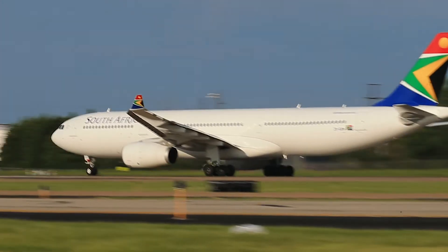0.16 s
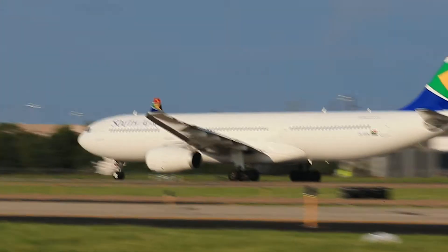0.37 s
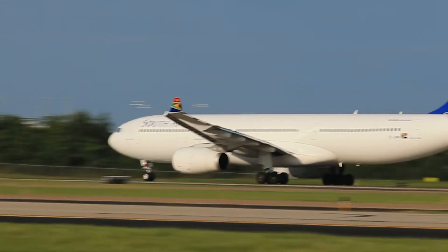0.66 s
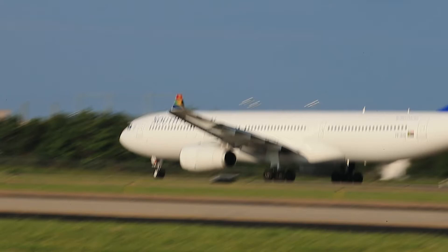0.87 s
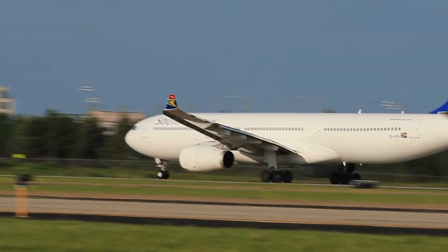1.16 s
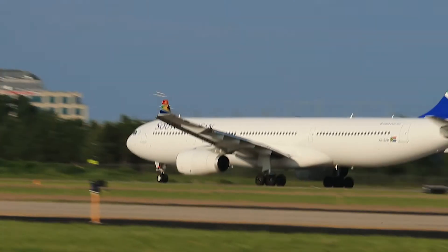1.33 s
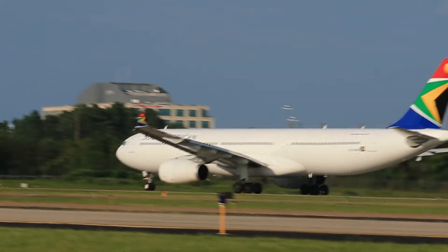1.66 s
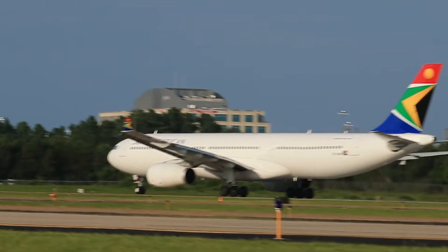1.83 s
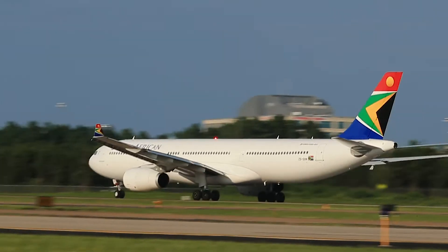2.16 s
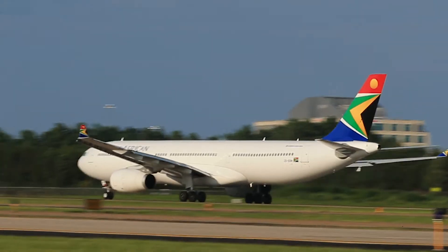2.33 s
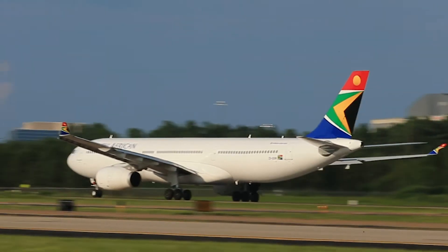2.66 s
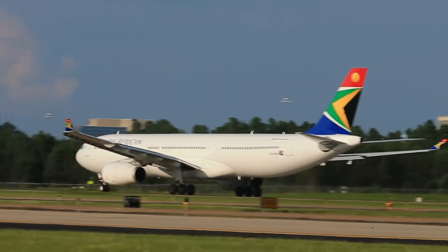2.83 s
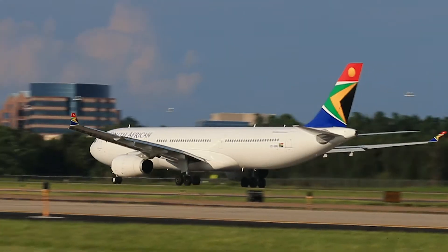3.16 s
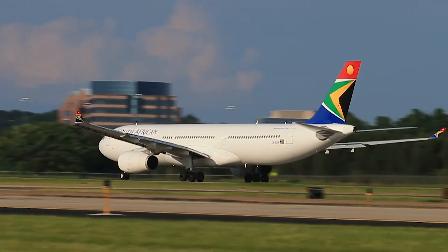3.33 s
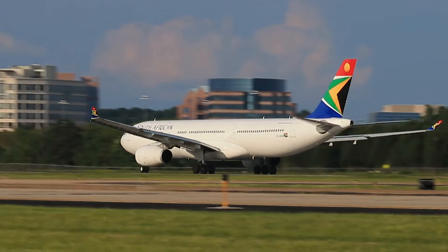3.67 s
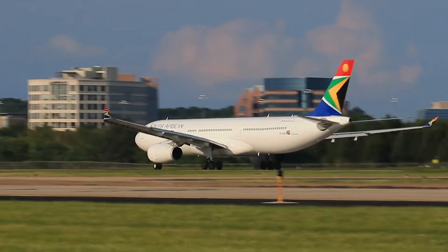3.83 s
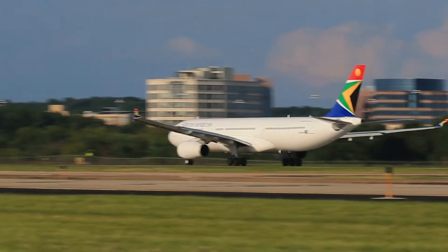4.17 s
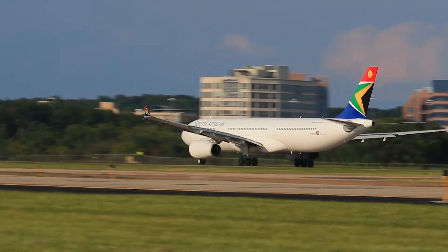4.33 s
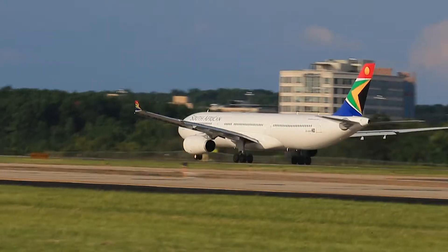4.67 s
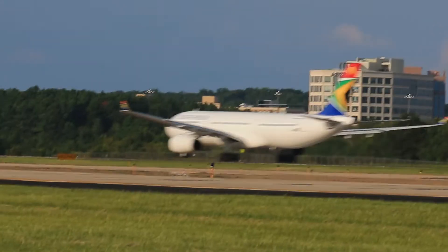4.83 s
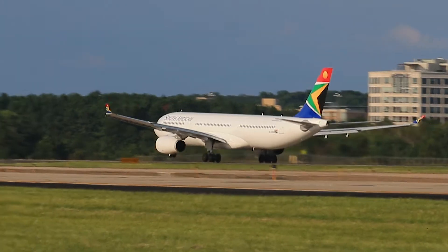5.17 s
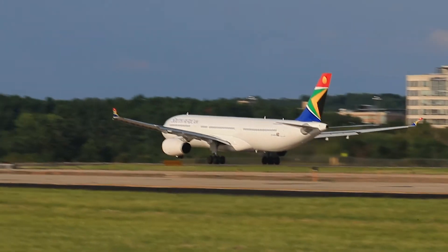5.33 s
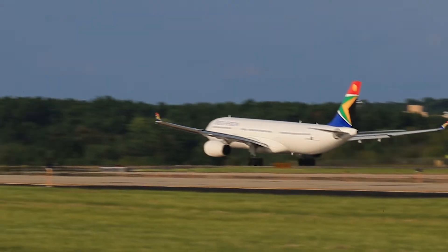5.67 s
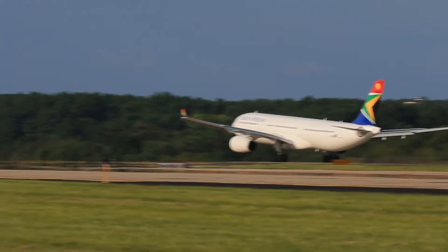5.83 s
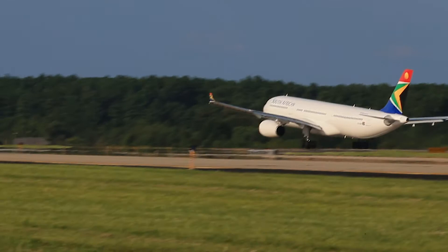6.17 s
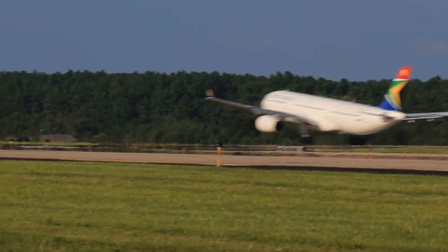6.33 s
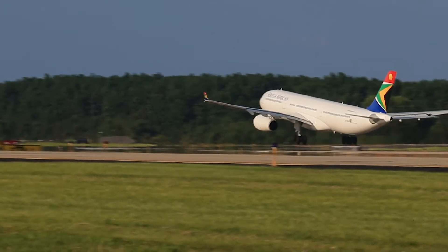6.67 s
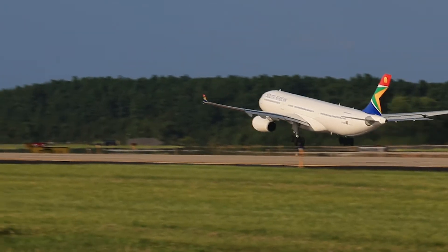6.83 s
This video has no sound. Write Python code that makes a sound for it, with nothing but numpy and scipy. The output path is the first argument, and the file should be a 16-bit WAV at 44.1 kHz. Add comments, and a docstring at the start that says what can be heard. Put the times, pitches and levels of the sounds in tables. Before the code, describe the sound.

The deep, surging rumble and roar of a departing twin-engine jet, heard beside the runway, with a few soft camera shutter snaps.

```python
"""Airliner takeoff from beside the airfield

A twin jet runs past and draws away. Its exhaust rumble sinks in pitch as the jets turn towards the
listener; a finer roar fades and swells in gusty air, with brief whistles. The two fans' beating whine
dies early. Nearby, insects sing faintly, a stills camera fires seven times and something clicks once."""
import sys
import numpy as np
from scipy import signal
from scipy.fft import rfft, irfft, next_fast_len
from scipy.io import wavfile
from scipy.ndimage import uniform_filter1d, map_coordinates

SR = 44100
rng = np.random.default_rng(int(sys.argv[2]) if len(sys.argv) > 2 else 0)


def bounce(signal):
    """Save signal as a 16-bit WAV file at the path given by the first command-line argument."""
    frames = np.transpose(np.atleast_2d(signal))
    limited = np.clip(frames, -1, 1)
    pcm = np.round(limited * 32767).astype(np.int16)
    wavfile.write(sys.argv[1], SR, pcm)


N = 308700
TIME = np.arange(N) / SR


def amp(db):
    """Decibels to gain."""
    return 10 ** (np.asarray(db) / 20)


def unit(x):
    """Scale to rms 1."""
    return x / np.sqrt(np.mean(x ** 2) + 1e-20)


def along(points, hz):
    """Interpolate (freq_hz, value) rows on a log axis."""
    freq_hz, values = np.transpose(points)
    return np.interp(np.log(hz + 1e-3), np.log(freq_hz), values)


def curves(rows, t=TIME):
    """Interpolate each column after time_s at times t."""
    time_s, *columns = np.transpose(rows)
    return [np.interp(t, time_s, column) for column in columns]


def wobble(rate_hz):
    """Smooth random curve, rate_hz knots a second."""
    return map_coordinates(rng.standard_normal(int(N * rate_hz / SR) + 4), [TIME * rate_hz])


def filtered(x, response):
    """Filter x by the gain response(hz)."""
    size = next_fast_len(N + SR // 2)
    return irfft(rfft(x, size) * response(np.fft.rfftfreq(size, 1 / SR)), size)[:N]


def noise(spectrum):
    """Steady noise, rms 1, coloured by (freq_hz, level_db) rows."""
    return unit(filtered(rng.standard_normal(N), lambda hz: amp(along(spectrum, hz))))


def band_noise(centre_hz, width_hz):
    """Noise in a Gaussian band, rms 1."""
    return unit(filtered(rng.standard_normal(N), lambda hz: np.exp(-((hz - centre_hz) / width_hz) ** 2)))


def moving_noise(gain_db, size):
    """Noise whose colour follows gain_db(hz, t)."""
    hz, t, frames = signal.stft(rng.standard_normal(N), SR, nperseg=size)
    return signal.istft(frames * amp(gain_db(hz[:, None], t)), SR, nperseg=size)[1][:N]


def patches(hz, t, size):
    """Random field, rms 1, smooth over size = (bins, frames)."""
    field = rng.standard_normal((len(hz), len(t)))
    for axis in (0, 1, 0, 1):
        field = uniform_filter1d(field, size[axis], axis)
    return unit(field)


def hump(track, octaves, hz, t):
    """Bell in dB over log frequency, following (time_s, centre_hz, height_db) rows."""
    centre_hz, db = curves(track, t)
    return db * np.exp(-(np.log2((hz + 1) / centre_hz) / octaves) ** 2)


def rumble(level_db=-15, heave_db=0.82, heave_hz=13, smooth_s=.11):
    """Big exhaust eddies: a surging hump of noise that slides down as the jets turn to the listener."""
    # Rumble from behind: freq_hz, relative_db
    spectrum = [(8, -48), (20, -32.5), (40, -9.5), (62, -1), (85, -0.5), (115, -2), (150, -9.5),
                (190, -17.5), (250, -28), (400, -40.5), (900, -72.5), (2000, -120)]
    # Pitch shift with angle: time_s, freq_ratio
    aft_shift = [(0, 1.25), (.35, 1.66), (1, 1.31), (1.4, 1.084), (2.1, 1.29), (3, 1), (4, 1), (5.2, 0.92),
                 (6.2, 1), (7, 0.88)]
    # Strongest surges and lulls: centre_s, half_length_s, gain_db
    surges = [(2.635, .035, 3.5), (3.057, 0.025, 8.5), (3.503, 0.03, -5.5), (4.07, 0.028, -5.5),
              (4.407, 0.013, 4.5), (4.763, 0.019, -7.5), (5.474, 0.024, 6.5), (5.903, 0.042, -7.5),
              (6.897, 0.038, 5)]
    sliding = [(20, 0), (110, 1)]  # freq_hz, shift_exponent: the deepest part stays put
    eddies = moving_noise(
        lambda hz, t: along(spectrum, hz / curves(aft_shift, t)[0] ** along(sliding, hz)), size=4096)
    # Dividing by the running rms keeps only the fast beating.
    running_rms = np.sqrt(np.abs(uniform_filter1d(eddies ** 2, int(smooth_s * SR))) + 1e-20)
    surges_db = sum(db * np.exp(-((TIME - s) / half_s) ** 2) for s, half_s, db in surges)
    return eddies / running_rms * amp(level_db + heave_db * wobble(heave_hz) + surges_db)


def air_loss(hz, t, db_per_s=1.47, edge_hz=5000):
    """Treble absorbed by the air as the aircraft recedes, in dB relative to mid-run."""
    return db_per_s * (t - t.mean()) * np.minimum(hz / edge_hz, 1.2) ** 4


def roar(patchy_db=0.86, flutter_db=0.52, gust_db=0.42, band_gust_db=.5, gust_hz=9):
    """Small eddies: broad noise whose three bands fade, partly together, through gusty air."""
    # Base colour: freq_hz, relative_db
    spectrum = [(100, -15.5), (280, 1), (450, 1), (800, -1), (1300, -0.1), (1700, -4.5), (2500, -7),
                (3500, -11), (4000, -20.5), (4700, -32), (5600, -42), (7000, -57.5), (9000, -69.5),
                (15000, -82.5)]
    # Band absorbed by the grass, sinking with distance: time_s, centre_hz, depth_db
    ground_dip = [(0, 611, 4.5), (1, 559, -0.5), (2, 512, 3), (3, 428, -0.5), (4, 368, 4), (5.2, 267, 8),
                  (6, 241.3, 1.5), (7, 240.4, 2)]
    # Rising hollow tone: time_s, centre_hz, gain_db
    hollow = [(0, 328, 6), (1, 331, 1), (2, 329, 6), (2.8, 450, -1), (3.2, 813, 2), (3.6, 796, 4),
              (3.9, 834, 4), (4.1, 1052, -1.5), (4.4, 1480, 3), (4.8, 1765, 1.5)]
    # Band levels before trim: time_s, low_db, middle_db, high_db
    band_levels = [(0.0, -32.5, -35, -37.5), (0.37, -30.5, -30.5, -37.5), (0.63, -37, -36.5, -40.5),
                   (1.1, -35.5, -39, -41.0), (1.4, -37, -36, -40.0), (2.05, -35.5, -37.5, -40.5),
                   (2.35, -37, -39, -42), (2.8, -37.5, -39, -43), (3.75, -34.0, -38.5, -41),
                   (4.3, -35, -36.5, -39.5), (4.95, -38, -41.5, -45.5), (5.421, -38.5, -38, -43.5),
                   (5.88, -38, -41, -44.0), (6.1, -35.5, -34.5, -38.5), (6.4, -33.5, -31.5, -39),
                   (6.58, -34.5, -38, -39.5), (6.88, -31.5, -31.5, -36.5), (7.0, -29, -33.5, -37.0)]
    trims_db = (0, -3, -1.5)

    def colour_db(hz, t):
        shape_db = along(spectrum, hz) - hump(ground_dip, 0.33, hz, t) + hump(hollow, 0.24, hz, t)
        return shape_db - air_loss(hz, t) + patchy_db * patches(hz, t, size=(7, 7))

    eddies = moving_noise(colour_db, size=1024)
    lowpass = lambda hz, edge_hz: 1 / (1 + (hz / edge_hz) ** 6)
    low = filtered(eddies, lambda hz: lowpass(hz, 965))
    high = filtered(eddies, lambda hz: 1 - lowpass(hz, 1855))
    middle = eddies - low - high
    bands = sum(unit(band) * amp(db + trim_db + band_gust_db * wobble(gust_hz))
                for band, db, trim_db in zip((low, middle, high), curves(band_levels), trims_db))
    return bands * amp(gust_db * wobble(gust_hz) + flutter_db * wobble(25))


def fans(blade_hz=2547, beat_hz=13, waver_hz=4, flicker_db=3, far_fan_db=-3, tone_db=-2.5, hiss_db=-14):
    """Two fans at slightly different speeds beat; tone and hiss beam sideways and fade once past."""
    fall_hz, fall_s, doppler_hz_per_s = 26.3, .09, 7.7
    beam_db, beam_drop_db, beam_end_s, beam_edge_s = -36, 15, .42, .04
    fade_start_s, fade_db_per_s = 1.15, 20
    pitch_hz = blade_hz + fall_hz * np.exp(-TIME / fall_s) - doppler_hz_per_s * TIME
    past_beam = .5 + .5 * np.tanh((TIME - beam_end_s) / (2 * beam_edge_s))
    gain_db = beam_db - beam_drop_db * past_beam - fade_db_per_s * np.maximum(TIME - fade_start_s, 0)
    blades = lambda hz: np.sin(2 * np.pi * np.cumsum(hz + waver_hz * wobble(45)) / SR)
    tone = unit(blades(pitch_hz + beat_hz / 2) + amp(far_fan_db) * blades(pitch_hz - beat_hz / 2))
    hiss = noise([(1500, -43.5), (3000, 2.5), (3800, 6.5), (5000, -10.5), (6500, -25.5), (9000, -47.5)])
    return amp(gain_db) * (tone * amp(tone_db + flicker_db * wobble(24)) + amp(hiss_db) * hiss)


def background_hiss(final_db=-70.5, rise_db=7, rise_s=5):
    """Faint hiss that grows slowly, then holds."""
    level_db = final_db + rise_db * (np.minimum(TIME / rise_s, 1) - 1)
    return amp(level_db) * noise([(1000, -4), (9000, 2), (15000, -1.5)])


def insects(trill_db=-83, trill_pulse_hz=21, chirp_pulse_hz=110, chirp_half_s=0.028, drift_hz=120):
    """In the grass one insect trills; three give high, pulsed chirps at regular intervals."""
    # Chirping insects: start_s, pitch_hz, period_s, level_db
    chirpers = [(4.03, 10200, .249, -72), (1.0, 9400, .5, -76.5), (4.35, 9000, .5, -77.5)]
    pulsing = lambda rate_hz: np.sin(np.pi * rate_hz * TIME) ** 2
    trill = band_noise(centre_hz=8000, width_hz=150) * np.interp(TIME, [2, 2.7, 5, 5.5], [0, 1, 1, 0])
    chirps = np.zeros(N)
    for start_s, hz, period_s, db in chirpers:
        nearest_chirp = np.maximum(np.round((TIME - start_s) / period_s), 0)
        offset_s = TIME - start_s - period_s * nearest_chirp
        carrier = np.sin(2 * np.pi * np.cumsum(hz + drift_hz * wobble(3)) / SR)
        chirps += amp(db + 2 * wobble(3)) * np.exp(-(offset_s / chirp_half_s) ** 2) * carrier
    return amp(trill_db) * trill * pulsing(trill_pulse_hz) + chirps * pulsing(chirp_pulse_hz)


def whistles(width_ratio=.03):
    """Narrow bands of noise flare briefly in the roar."""
    # Flares: centre_s, half_length_s, pitch_hz, level_db
    flares = [(1.498, .025, 2700, -42), (3.89, .06, 848, -36), (4.4, .025, 1490, -40)]
    return sum(amp(db) * np.exp(-((TIME - s) / half_s) ** 2) * band_noise(hz, width_ratio * hz)
               for s, half_s, hz, db in flares)


def shutter(gain_db=-7, contact_t60_s=.03, whirr_db=-56, whirr_half_s=0.04, whirr_delay_s=.04):
    """Stills camera: the mirror flips up, the curtains snap, the mirror drops over the motor's whirr."""
    # Exposures, before gain_db: snap_s, snap_db, mechanism_db (gain of mirror and motor)
    exposures = [(1.636, -44, -3.5), (2.4754, -39.5, -1), (3.74, -38, -1.5), (4.4009, -36.5, 0),
                 (6.115, -36.5, 2.5), (6.6118, -39, 0), (6.8648, -38, 2.5)]
    # Mirror contacts, rise to return: offset_from_snap_s, relative_db
    contacts = [(-.063, -50), (-.049, -47), (-.033, -53), (.030, -48.5), (0.038, -47), (.066, -52)]
    # Shutter colour: freq_hz, relative_db
    spectrum = [(1500, 1), (5000, 5), (6800, 2), (8000, 6), (9500, -3), (14000, -3), (16000, -16)]
    envelope, t = np.zeros(N), np.arange(-SR // 8, SR // 8) / SR
    for snap_s, snap_db, mechanism_db in exposures:
        power = amp(whirr_db + mechanism_db) ** 2 * np.exp(-((t - whirr_delay_s) / whirr_half_s) ** 4)
        hits = [(0.00025, snap_db)] + [(offset_s, db + mechanism_db) for offset_s, db in contacts]
        for offset_s, db in hits:
            hit_db = db + rng.normal(0, 1) - 60 * np.abs(t - offset_s) / contact_t60_s
            power += (t >= offset_s) * amp(hit_db) ** 2
        envelope += np.interp(TIME - snap_s, t, np.sqrt(power), left=0, right=0)
    return amp(gain_db) * envelope * noise(spectrum)


def click(crack_db=-5, crack_t60_s=.005):
    """A small hard contact: a crack and a few milliseconds of plastic ring."""
    # Contact: start_s, gain_db
    contacts = [(4.065, -14.5)]
    # Casing modes: freq_hz, relative_db, t60_s
    modes = [(1750, -9, 0.013), (2270, -1.5, .017), (2860, -4, 0.0059), (3980, -11, 0.0086),
             (4670, -24, .008), (7200, -12.5, 0.0093), (8500, -22, .011), (11420, -11, 0.0096),
             (13400, -8, .003)]
    out, t = np.zeros(N), np.arange(SR // 20) / SR
    for start_s, gain_db in contacts:
        ring = sum(amp(db - 60 * t / t60_s) * np.sin(2 * np.pi * hz * t) for hz, db, t60_s in modes)
        crack = amp(crack_db - 60 * t / crack_t60_s) * rng.standard_normal(len(t))
        out[round(start_s * SR):][:len(t)] += amp(gain_db) * (ring + crack)
    return out


def scene():
    """Faint hiss, the aircraft and the small near sounds, in mono."""
    return (background_hiss() + rumble() + roar() + fans() + click() + shutter() + insects()
            + whistles())[None]


def record(dry, fade_s=.004, cutoff_hz=15700, transition_hz=500):
    """Fade both ends and low-pass."""
    from_edge_s = np.minimum(TIME, TIME[::-1])
    fade = np.sin(np.pi / 2 * np.minimum(from_edge_s / fade_s, 1)) ** 2
    return filtered(dry[0] * fade, lambda hz: np.clip((cutoff_hz - hz) / transition_hz + .5, 0, 1))[None]


dry = scene()
out = record(dry)
bounce(out)
```